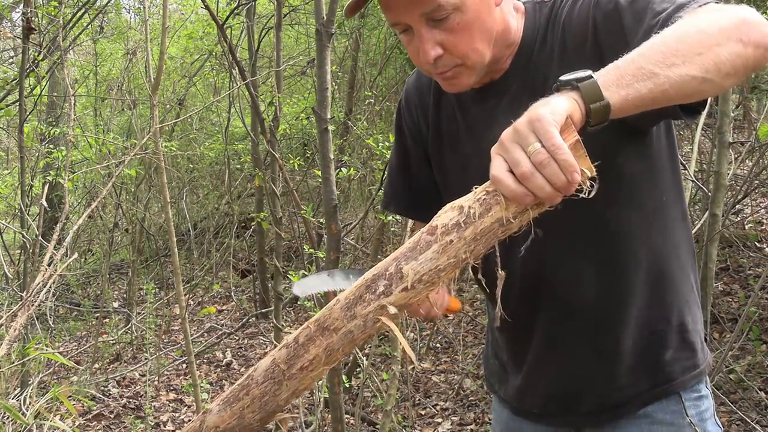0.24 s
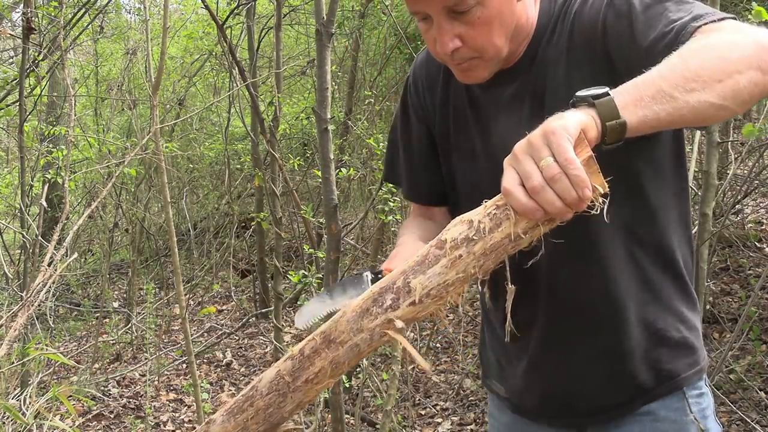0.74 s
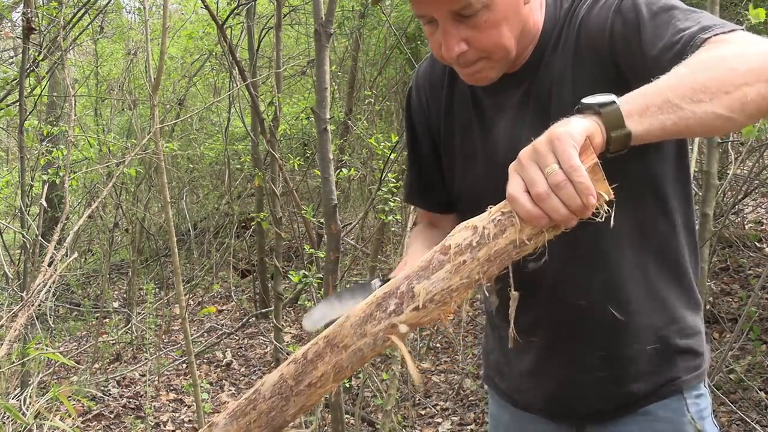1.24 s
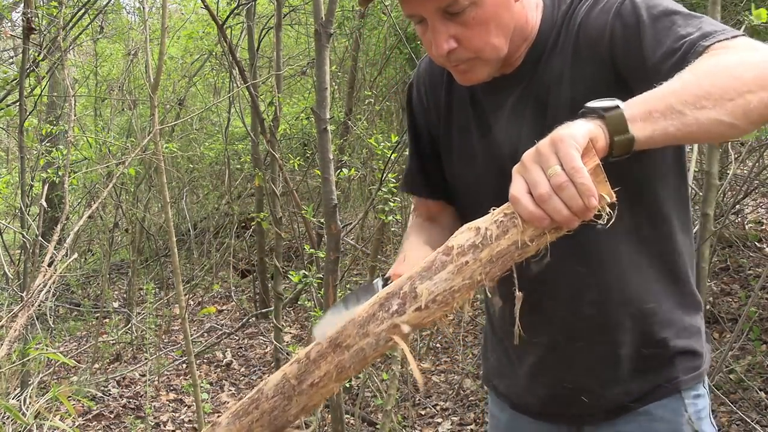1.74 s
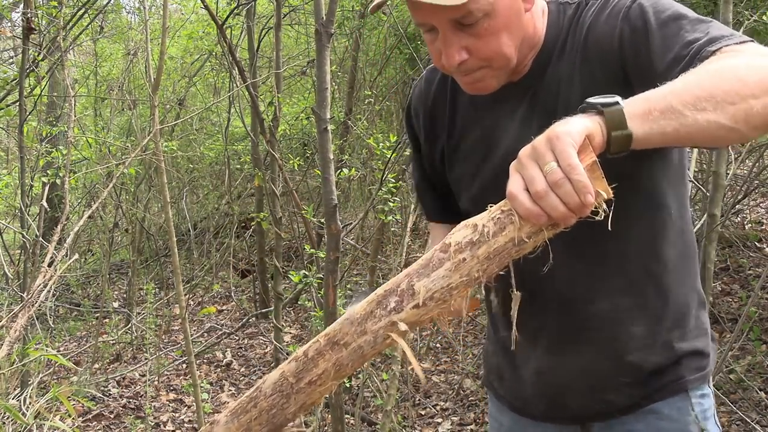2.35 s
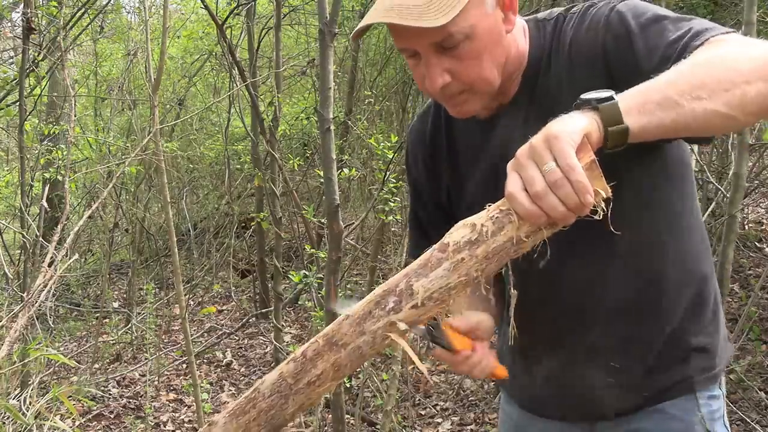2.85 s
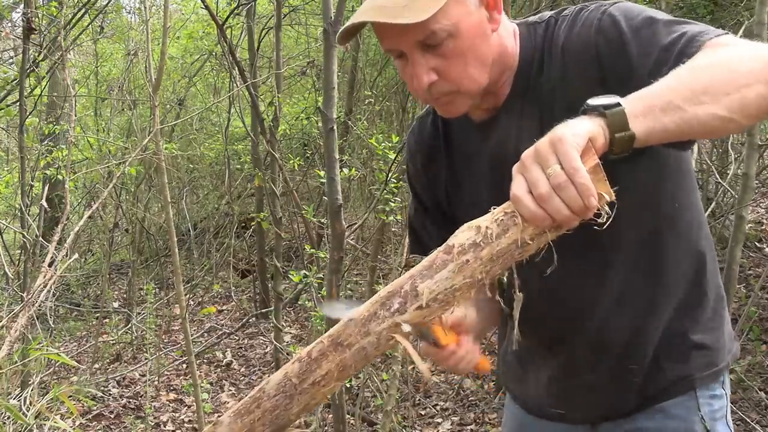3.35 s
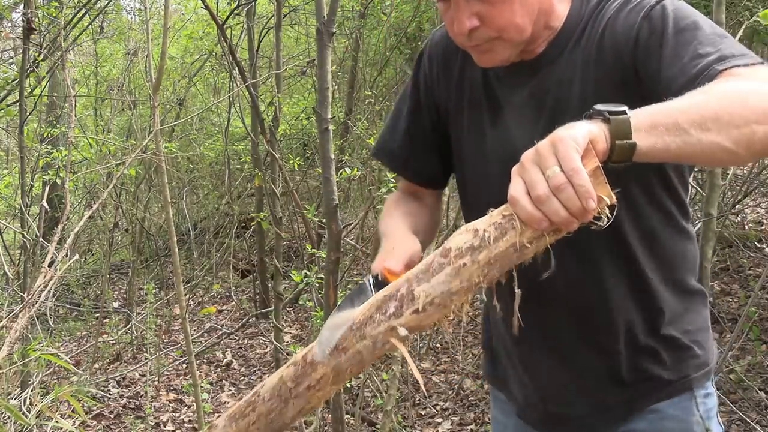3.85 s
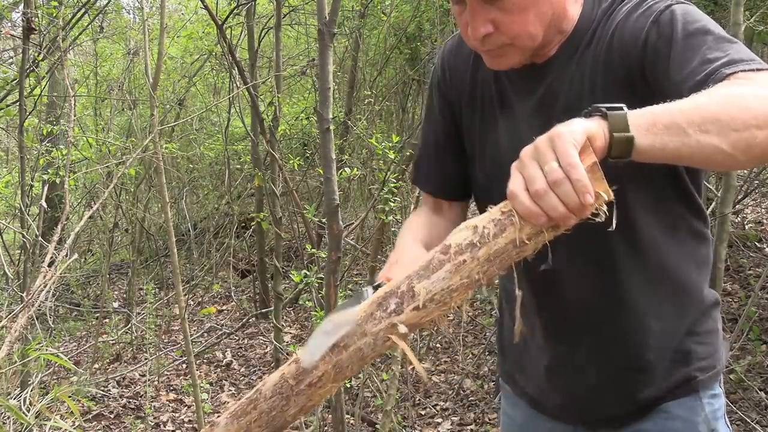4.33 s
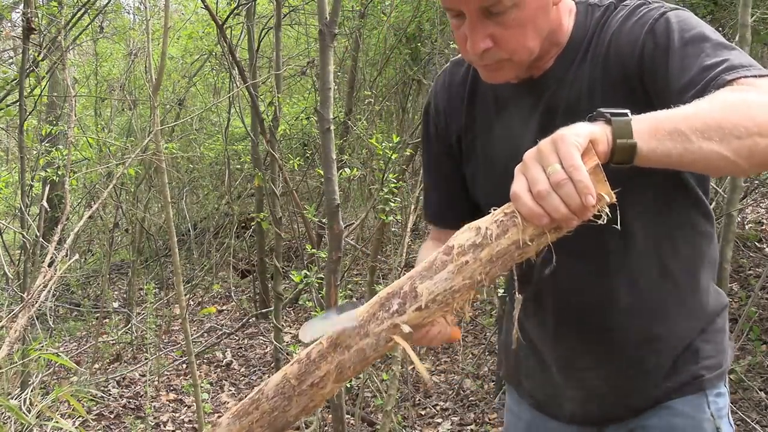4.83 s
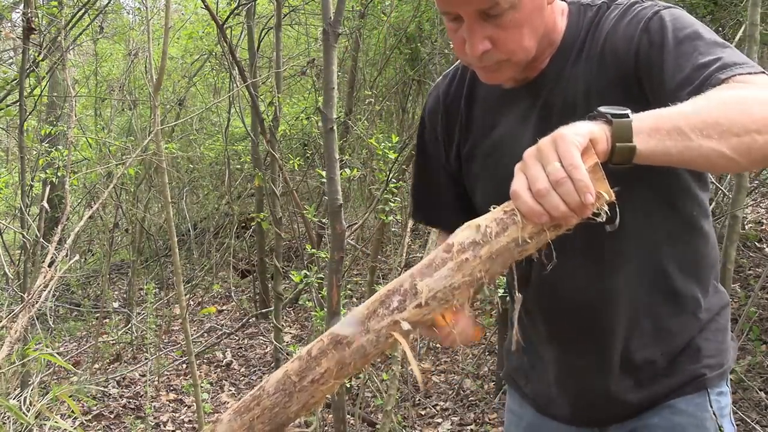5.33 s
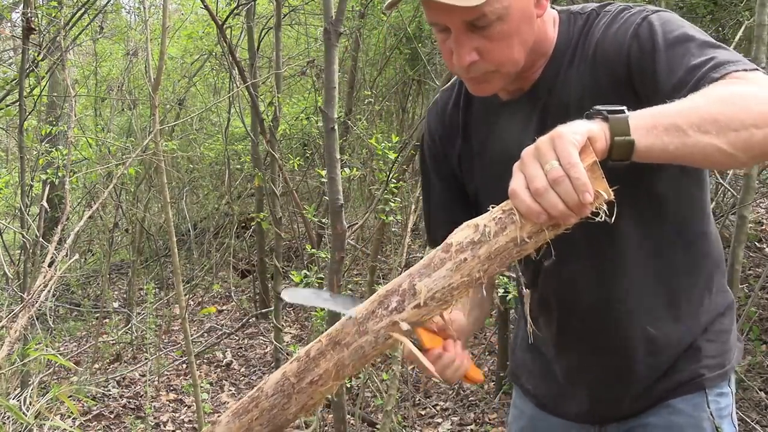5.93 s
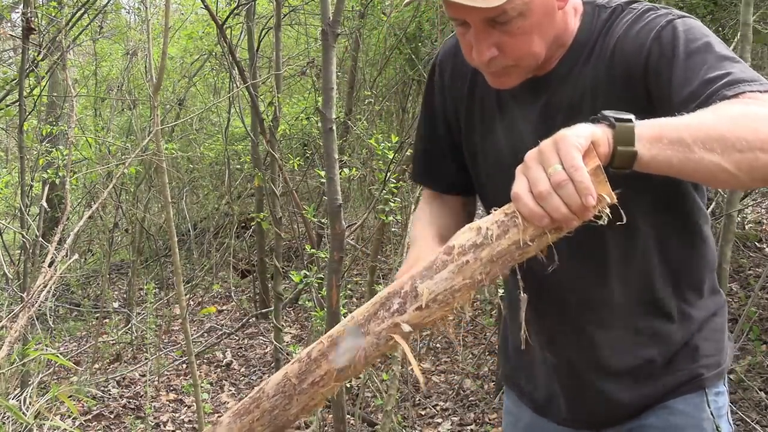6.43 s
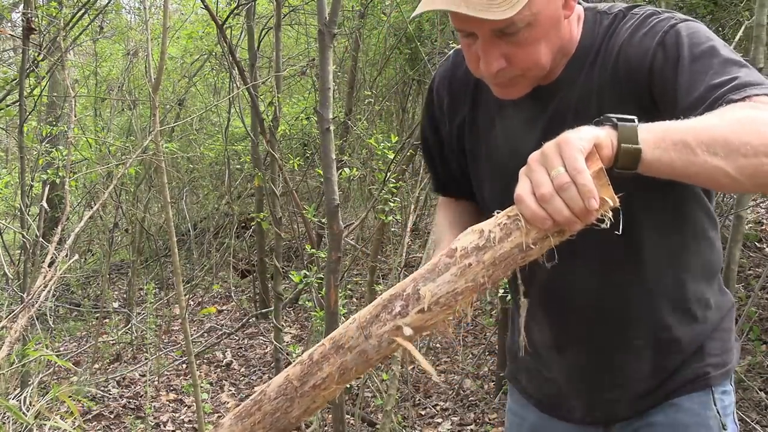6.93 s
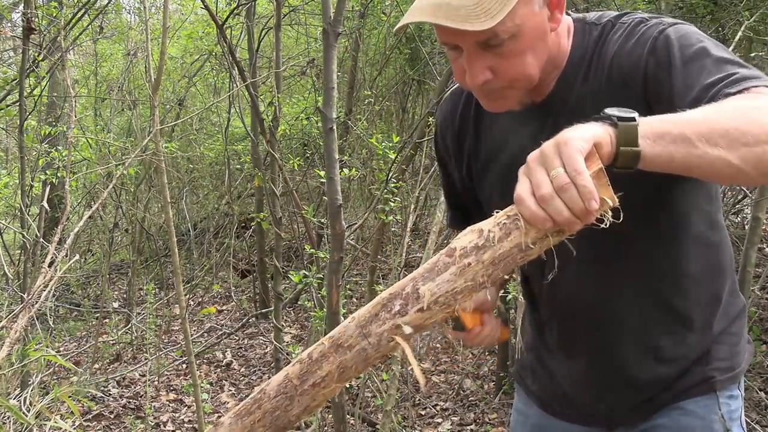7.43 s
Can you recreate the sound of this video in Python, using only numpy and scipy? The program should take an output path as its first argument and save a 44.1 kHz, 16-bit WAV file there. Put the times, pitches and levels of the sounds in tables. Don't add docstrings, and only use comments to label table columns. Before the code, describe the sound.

In a breezy wood, a hand saw cuts a dry limb close by, about four fast strokes each way per second, with a bright rasp, crackling fibres and thin steely ringing. It grows stronger, breaks off briefly midway with small ticks and a knock, then resumes thinner and duller. Low wind buffets the microphone, strongest in the later half, over faint leaf hiss.

```python
import sys
import numpy as np
from scipy import signal
from scipy.fft import rfft, irfft
from scipy.io import wavfile
from scipy.ndimage import uniform_filter1d

SR = 44100
rng = np.random.default_rng(int(sys.argv[2]) if len(sys.argv) > 2 else 0)


def rack_gain(trim_db):
    fader = np.asarray(trim_db, float)
    return 10 ** (fader / 20)


def generate_wav(sig):
    pcm = np.round(np.clip(np.atleast_2d(sig).T, -1, 1) * 32767).astype(np.int16)
    wavfile.write(sys.argv[1], SR, pcm)


N = 338688
T = np.arange(N) / SR

# (frequency [Hz], width [Hz], level [dB])
LIMB = [(255.5, 114, 6), (438.5, 100, 0.5), (565, 108, 0), (690, 81, -1), (942, 370, 0.5)]
# (frequency [Hz], width [Hz], level [dB])
BLADE = [(1050, 150, -5.5), (1282, 150, -1.5), (1379, 33.4, 5.5), (1710, 67, 3), (1757, 130, -2.5),
         (1857, 186, 3.5), (2096, 82, -0.5), (2276, 62, 1), (2417, 57, -3), (2656, 59, -5)]


def unit(x):
    return x / np.sqrt(np.mean(x ** 2))


def band(x, lo_hz, hi_hz, order=2):
    return signal.sosfilt(signal.butter(order, [lo_hz, hi_hz], "band", fs=SR, output="sos"), x)


def walk(rate):
    hold = int(SR / rate)
    levels = np.repeat(rng.standard_normal(N // hold + 1), hold)
    return 1.2 * uniform_filter1d(levels, hold)[:N]


def ring(x, modes, sway_db=0.):
    out = 0
    for k, (hz, width_hz, db) in enumerate(modes):
        b, a = signal.iirpeak(hz, hz / width_hz, fs=SR)
        drive = x * rack_gain(sway_db * walk(22)[:len(x)]) if sway_db else x
        out = out + (-1) ** k * rack_gain(db) / np.sqrt(width_hz) * signal.lfilter(b, a, drive)
    return out


def air():
    # (frequency [Hz], level [dB per Hz])
    air_spectrum = [(110, -40), (170, -45), (260, -46.5), (400, -50.5), (700, -52), (1000, -60),
                    (1500, -65.5), (2500, -70), (4000, -79.5), (9000, -84.5), (16000, -111)]
    level_db = -41.5
    table_hz, table_db = np.transpose(air_spectrum)
    hz = np.fft.rfftfreq(N, 1 / SR)
    gain = rack_gain(np.interp(np.log(hz + 1), np.log(table_hz), table_db)) * (hz > 90)
    noise = irfft(rfft(rng.standard_normal(N)) * gain, N)
    return unit(noise) * rack_gain(level_db + 0.5 * walk(2.8))


def bird():
    # (time [s], length [s], from [Hz], to [Hz], level [dB])
    chirps = [
        (.415, .07, 2950, 2650, -58),
        (.7, .05, 2950, 2750, -57),
        (.95, .05, 2950, 2700, -60),
    ]
    out = np.zeros(N)
    for s, length, from_hz, to_hz, db in chirps:
        u = np.linspace(0, 1, int(length * SR))
        hz = from_hz + (to_hz - from_hz) * u ** 2
        tone = np.sin(2 * np.pi * np.cumsum(hz) / SR)
        out[int(s * SR):int(s * SR) + len(u)] += rack_gain(db) * np.sin(np.pi * u) * tone
    return out


def trees(x, t60=0.57, db=-24):
    t = np.arange(int(.3 * SR)) / SR
    tail = rng.standard_normal(len(t)) * np.exp(-np.log(1000) * t / t60) * (t > .004)
    return x + rack_gain(db) * signal.fftconvolve(x, tail / np.sqrt(np.sum(tail ** 2)))[:N]


def wind():
    # (time [s], wind pressure [dB])
    gusts = [
        (0, -36.5),
        (.9, -38.5),
        (1.7, -31.5),
        (2.4, -29),
        (3.5, -31),
        (4.5, -25.5),
        (5.6, -22),
        (6.9, -26.5),
        (7.68, -27),
    ]
    # (time [s], extra pressure [dB])
    puffs = [(.2, 11.5), (.72, 6.5), (1.11, 17.5), (1.47, 11.5), (1.95, 12), (2.2, -3.5), (2.73, 8.5),
             (3.08, 15.5), (3.35, 10), (3.8, 8), (4.15, 9), (4.45, 8), (4.9, 9.5), (5.07, 8.5), (5.36, 4.5),
             (5.56, 8.5), (5.9, 3.5), (6.15, 8.5), (6.5, 8), (6.73, 8), (7.12, 12.5), (7.54, 10.5)]
    # (from [Hz], to [Hz], level in a usual gust [dB], slope [dB per gust dB],
    # evened over [s], own wander [dB], wanders [per s])
    eddies = [
        (5.39, 27.85, -11, .5, 0.15, 2, 5),
        (31.7, 62.4, -25, 1.3, 0.25, 0.5, 6),
        (66, 110.6, -40, 1.14, 0.14, 1, 6.4),
    ]
    usual_gust_db, puff_half_width_s, limit = -22, 0.073, .95
    gust_db = np.interp(T, *np.transpose(gusts)) - usual_gust_db
    gust_db = gust_db + sum(db * np.exp(-((T - s) / puff_half_width_s) ** 2 / 2) for s, db in puffs)
    pressure = 0
    for lo_hz, hi_hz, db, slope, hold_s, wander_db, rate in eddies:
        eddy = unit(band(rng.standard_normal(N + SR), lo_hz, hi_hz, order=3)[SR:])
        power = uniform_filter1d(eddy ** 2, int(hold_s * SR))
        power = uniform_filter1d(power, int(hold_s * SR / 2))
        steady = unit(eddy / np.sqrt(power + 0.26))
        pressure = pressure + steady * rack_gain(db + slope * gust_db + wander_db * walk(rate))
    fade_out = np.sin(np.pi / 2 * np.clip((T[-1] - T) * 20, 0, 1))
    return limit * np.tanh(pressure / limit) * fade_out


def ticks():
    # (time [s], peak level [dB], centre [Hz])
    clicks = [(.197, -36.5, 3500), (0.266, -14, 13300), (.52, -17, 13400), (1.509, -16, 13200),
              (2.353, -23, 6000), (2.366, -13, 13560), (2.729, -27, 8710), (2.99, -42, 5000),
              (3.016, -25, 6000), (3.147, -16, 13380), (3.643, -53, 6040), (3.717, -48, 10000),
              (3.728, -31, 5980), (3.736, -41, 12000), (3.758, -37, 2520), (3.777, -26.5, 7650),
              (3.914, -34.5, 8430), (4.459, -21, 13210)]
    # (time [s], peak level [dB], centre [Hz])
    snags = [(0.5926, -26, 13200), (1.0981, -18, 13200), (1.5923, -22, 14500), (1.8448, -22, 13200),
             (1.9688, -28, 13600), (2.0943, -16, 13300), (2.2254, -25, 13600), (2.6187, -19, 13200),
             (3.3957, -22, 13100), (3.9555, -25, 13400), (4.7209, -20, 13900), (4.9796, -28, 13300),
             (5.5293, -28, 13100), (6.896, -28, 8740), (7.45, -28, 13200)]
    # (time [s], peak level [dB])
    knocks = [
        (3.97, -24),
        (4.141, -14),
    ]
    snag_db = -2
    out, t = np.zeros(N), np.arange(1500) / SR
    for s, db, hz in clicks + [(s, db + snag_db, hz) for s, db, hz in snags]:
        grain = rng.standard_normal(len(t))
        burst = ring(grain * np.exp(-t / .0012), [(hz, 6000, 0)])
        burst = burst + ring(grain * np.exp(-t / .004), [(hz, 1500, -16)])
        out[int(s * SR):int(s * SR) + len(t)] += rack_gain(db + 2.0) * burst / np.max(np.abs(burst))
    for s, db in knocks:
        burst = ring(np.exp(-t / 0.00017), LIMB + BLADE)
        out[int(s * SR):int(s * SR) + len(t)] += rack_gain(db) * burst / np.max(np.abs(burst))
    return out


def hump(u, peak, sharp):
    warp = np.log(.5) / np.log(np.clip(peak, .2, .85))
    h = np.sin(np.pi * u ** warp) ** sharp
    return h / np.sqrt(np.mean(h ** 2))


def strokes():
    # (time [s], length [s], rasp of the teeth [dB], load on the limb [dB])
    pulls = [(.242, 0.12, -26.5, -37), (.591, .11, -23, -35), (.85, 0.096, -21.5, -29),
             (1.086, .099, -23.5, -30), (1.337, .099, -23, -32), (1.586, 0.099, -23, -29.5),
             (1.841, .092, -21.5, -27.5), (2.092, .11, -23.5, -29), (2.347, .11, -20, -26.5),
             (2.609, 0.1, -20, -27), (2.87, 0.098, -19.5, -28.5), (3.132, 0.091, -23, -31.5),
             (3.384, .11, -25.5, -32.5), (3.949, 0.094, -25, -32), (4.182, .13, -25.5, -32),
             (4.445, .12, -26, -29.5), (4.709, .11, -23.5, -29.5), (4.975, .12, -24, -31),
             (5.242, .126, -27, -34.5), (5.523, .11, -27, -36), (5.796, .12, -26, -34),
             (6.074, .11, -26.5, -35), (6.342, 0.12, -29, -35), (6.614, .12, -27.5, -33),
             (6.891, 0.13, -25, -32.5), (7.157, .12, -23, -31.5), (7.439, 0.1, -20.5, -30)]
    pushes = [(.493, 0.075, -32.5, -39), (.744, 0.084, -29, -38.5), (.979, 0.088, -26.5, -33.5),
              (1.225, .079, -25, -33.5), (1.465, 0.087, -27.5, -35.5), (1.713, 0.094, -27.5, -33.5),
              (1.966, 0.094, -23.5, -31), (2.222, 0.11, -25.5, -32), (2.482, .11, -25, -30.5),
              (2.749, 0.095, -24.5, -24.5), (2.999, 0.1, -30.5, -30.5), (3.263, 0.096, -29.5, -32.5),
              (3.519, .11, -35.5, -44.5), (3.815, 0.075, -31.5, -43.5), (4.058, 0.1, -25.5, -33),
              (4.327, .093, -27, -37.5), (4.594, 0.095, -29, -34), (4.855, 0.096, -29, -33.5),
              (5.114, .116, -29, -35), (5.394, .1, -29, -38), (5.667, 0.1, -30.5, -36.5),
              (5.954, 0.092, -30, -33), (6.228, 0.093, -30.5, -38), (6.492, 0.098, -29, -41),
              (6.75, .11, -31, -39.5), (7.035, 0.099, -25.5, -31), (7.306, 0.1, -26, -30),
              (7.577, .12, -29.5, -32)]
    # (rasp peak [0-1], steepness of its swell, first bite [0-1], tooth tips [dB],
    # load peak [0-1], steepness of its swell, tooth rate [Hz], blade [dB], thud [dB])
    pull_manner = (0.5, 0.82, 0.18, 1.8, .55, 0.77, 277, -31, -45.5)
    push_manner = (0.6, 0.7, 0.45, 1.7, 0.66, 0.66, 222, -30.5, -38)
    # (time [s], extra thud [dB])
    chatters = [(.54, 8.5), (.65, 11), (1.04, 7.5), (1.15, 4), (1.28, 5), (1.65, 7.5), (1.89, 5), (2.16, 3),
                (2.29, 2.5), (4.14, 0.5), (4.66, 5.5), (4.92, 3), (6.28, 3), (6.96, -0.5), (7.1, 6),
                (7.37, 3)]
    usual_rasp_db, usual_load_db = -25, -31
    blade_per_rasp, blade_per_load, thud_per_load = 0.16, 0.6, 0.57
    pace_scatter, thud_scatter_db = .04, 1.5
    tips_steeper = 1.4
    surge_db, surges_per_s = .8, 60
    tooth_hz, force = np.full(N, 150.), np.zeros((5, N))
    for table, manner in ((pulls, pull_manner), (pushes, push_manner)):
        rasp_peak, rasp_steep, bite, tips_db, load_peak, load_steep, pace_hz, blade_db, thud_db = manner
        for start, length, rasp_db, load_db in table:
            pace, grip = rng.standard_normal(2)
            i, u = int(start * SR), np.linspace(1e-6, 1, int(length * SR))
            part, room = slice(i, i + len(u)), N - i
            load = hump(u, load_peak, load_steep)
            extra_db = load_db - usual_load_db
            chatter_db = sum(db for s, db in chatters if start < s < start + length)
            jerk = bite * np.exp(-u / 0.1) * np.clip(u / 0.015, 0, 1)
            speed = hump(u, rasp_peak, rasp_steep) + jerk
            rasp = rack_gain(rasp_db) * speed
            tips = rack_gain(tips_db + rasp_db) * speed ** tips_steeper
            blade_db_now = blade_db + blade_per_rasp * (rasp_db - usual_rasp_db) + blade_per_load * extra_db
            blade = rack_gain(blade_db_now) * load
            thud_db_now = thud_db + thud_per_load * extra_db + thud_scatter_db * grip + chatter_db
            thud = rack_gain(thud_db_now) * hump(u, load_peak + 0.05, 1.85)
            force[:, part] += np.array([rasp, tips, blade, rack_gain(load_db) * load, thud])[:, :room]
            hand = .76 + .26 * np.sin(np.pi * u)
            tooth_hz[part] = (pace_hz * (1 + pace_scatter * pace) * hand)[:room]
    return tooth_hz, force * rack_gain(surge_db * walk(surges_per_s))


def fibres(rate, scatter_db):
    chance = rng.random((N, 3)).T
    snaps = chance[0] < rate / SR
    strength = rack_gain(-scatter_db * np.log(chance[1] + 1e-9))
    return unit(snaps * strength * np.sign(chance[2] - .3))


def saw():
    # (frequency [Hz], width [Hz], level [dB])
    tooth_modes = [(3070, 160, -8), (7730, 480, -1), (8650, 750, 7), (9860, 410, 4.5), (11200, 1000, -0.5)]
    # (frequency [Hz], width [Hz], level [dB])
    tip_modes = [(12000, 260, 13.5), (13300, 160, 16), (13750, 270, 11.5), (14500, 330, 16.5)]
    # (time [s], level [dB])
    free_edge = [
        (0, -7.5),
        (1.5, -9.5),
        (2.5, -10),
        (3.2, -15),
        (4.5, -10.5),
        (5.5, -14.5),
        (6.5, -14.5),
        (7.68, -16.5),
    ]
    sway_db = 2.3
    tooth_hz, (rasp, tips, blade, limb, thud) = strokes()

    turns = np.cumsum(tooth_hz * (1 + .05 * walk(120))) / SR
    catch = np.diff(np.floor(turns), prepend=0) * rack_gain(2.5 * rng.standard_normal(N))
    catch = unit(uniform_filter1d(catch, size=5))
    gate = np.exp(-(turns % 1) / 2.21)
    flare = gate * rack_gain(1.12 * walk(150) + 0.96 * walk(35))

    wood = .6 * catch + 1.5 * fibres(2500, 1.6) * rack_gain(2.4 * walk(60))
    thuds = ring(thud * (catch + 0.85 * wood), [LIMB[0], (465, 130, -1.5)])
    crackle = ring(limb * wood, LIMB[1:], sway_db)
    kerf = band(blade * fibres(3000, 4.0), 390, 2360, order=1)

    drive = 0.24 * catch + 1.02 * fibres(4000, 1.25) * rack_gain(1.6 * walk(90))
    singing = ring(blade * drive, BLADE, sway_db)

    tear = flare * fibres(9000, 0.78)
    free = tips * rack_gain(np.interp(T, *np.transpose(free_edge)))
    sizzle = band(free * flare * fibres(8000, 0.85), 9800, 20600)
    steel = ring(rasp * tear, tooth_modes, 3.0) + ring(free * tear, tip_modes, 2.7) + rack_gain(-19.5) * sizzle

    scrape = (rasp + 0.4 * blade) * flare
    hiss = band(scrape * fibres(7000, 0.92), 2500, 7500, order=1)
    upper_modes = [(hz, 170, 0) for hz in np.linspace(2900, 7400, num=12)]
    streaks = ring(scrape * fibres(3000, 1.8), upper_modes, 3.4)

    fall = np.exp(-1 / (.35 * SR))
    falling = signal.lfilter([1 - fall], [1, -fall], rasp)
    dust = falling * band(fibres(1800, 1.9), 1900, 9500, order=1)

    out = rack_gain(-8.5) * kerf + rack_gain(24.0) * thuds + rack_gain(27.5) * crackle
    out = out + rack_gain(25.5) * singing + rack_gain(21.5) * steel
    return out + rack_gain(-9) * hiss + rack_gain(13.0) * streaks + rack_gain(-19.5) * dust


def scene():
    return (trees(saw() + ticks() + bird()) + wind() + air())[None]


def roll_off(x):
    return signal.sosfilt(signal.butter(12, 16460, fs=SR, output="sos"), x)


def record(dry):
    top_cut = signal.ellip(14, .3, 60, 15690, fs=SR, output="sos")
    mix = signal.sosfilt(top_cut, dry)
    return roll_off(mix)


dry = scene()
out = record(dry)
generate_wav(out)
```